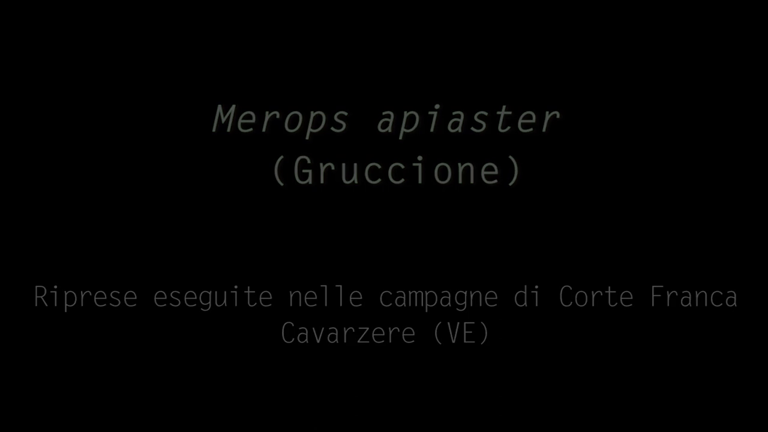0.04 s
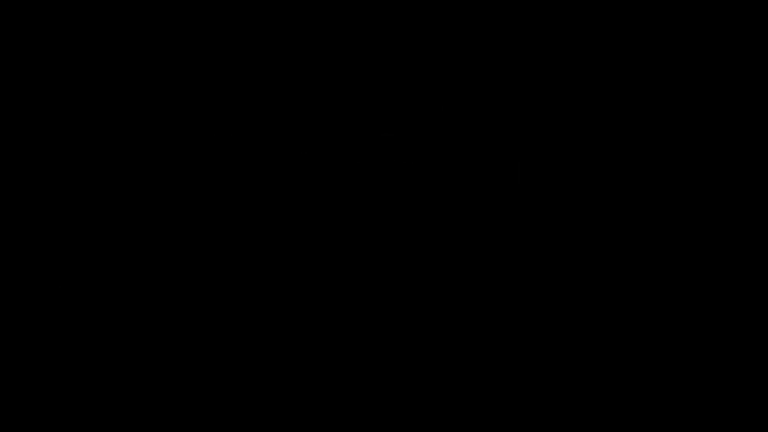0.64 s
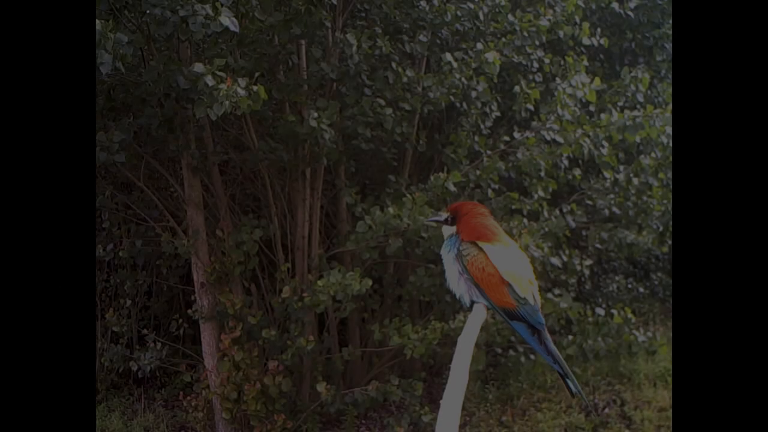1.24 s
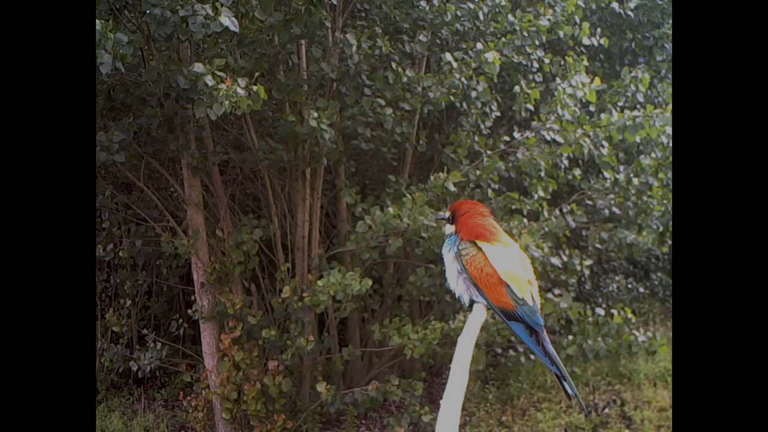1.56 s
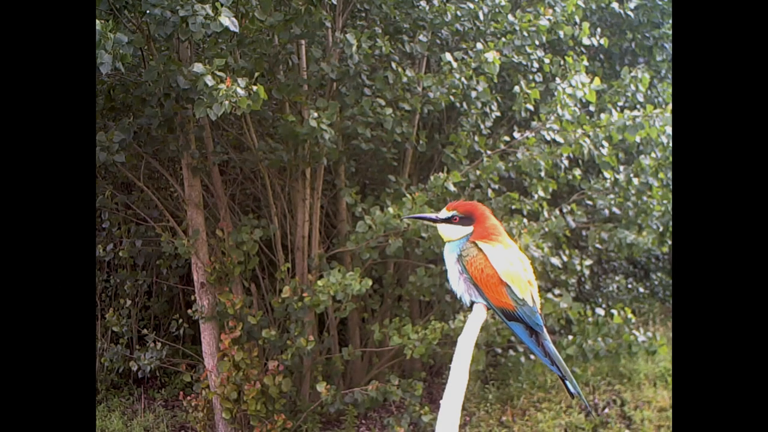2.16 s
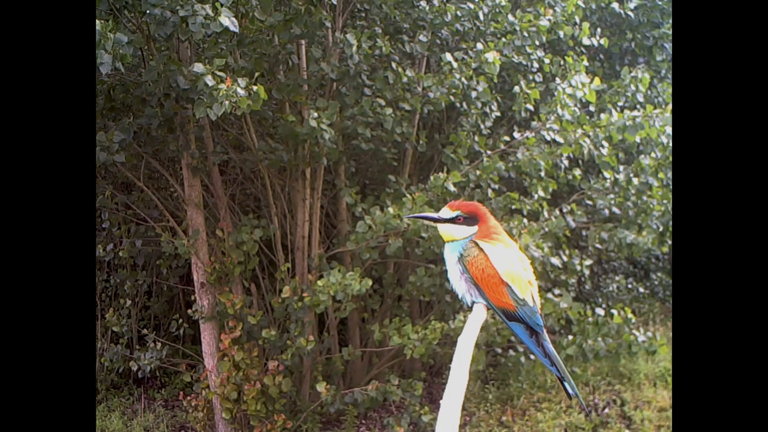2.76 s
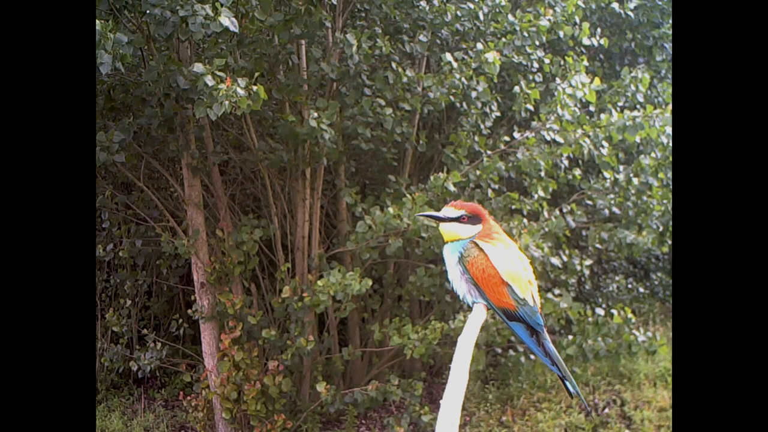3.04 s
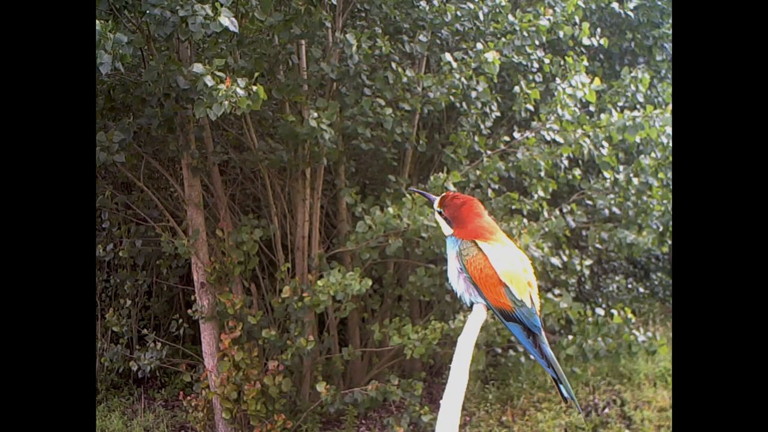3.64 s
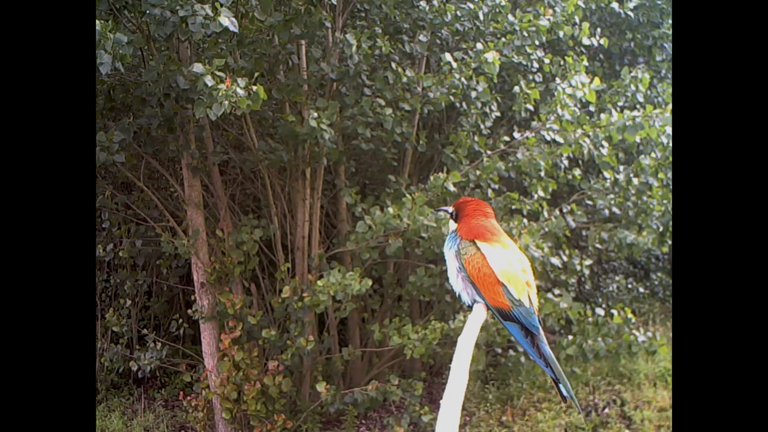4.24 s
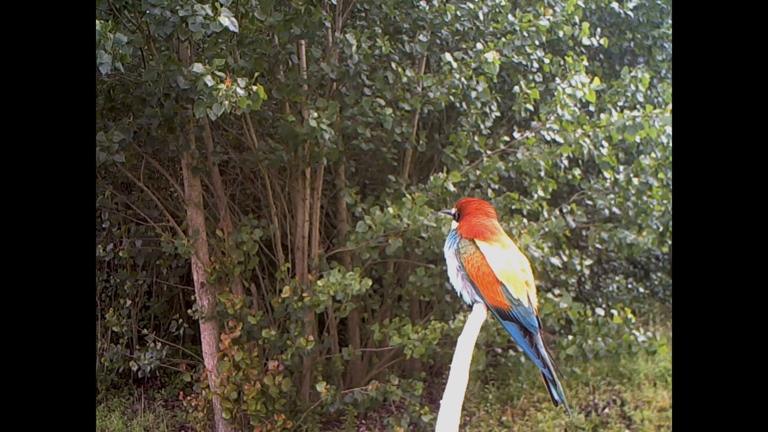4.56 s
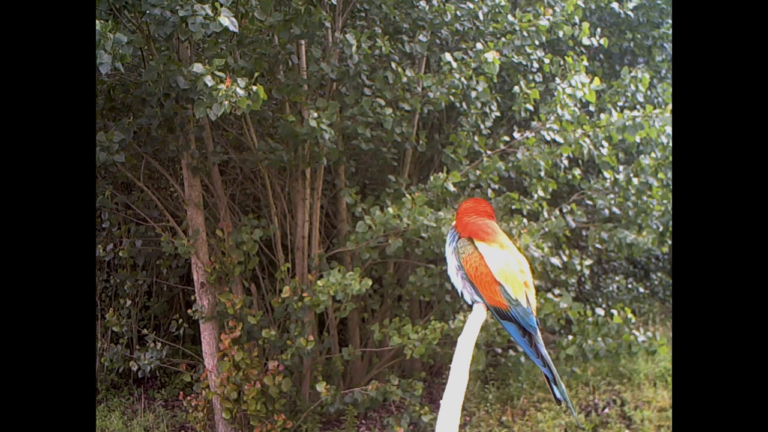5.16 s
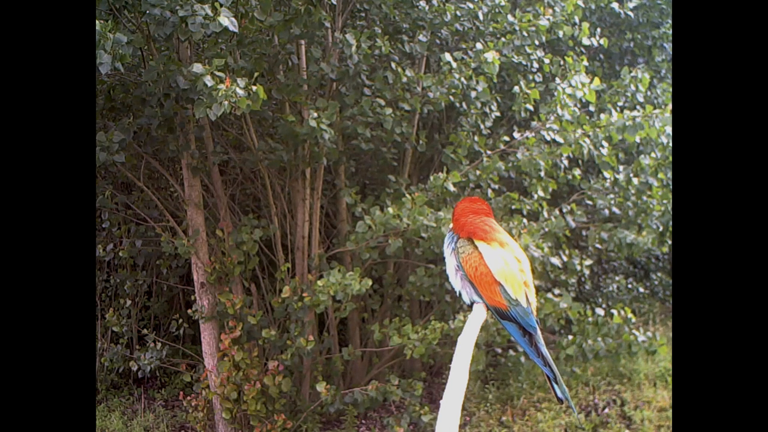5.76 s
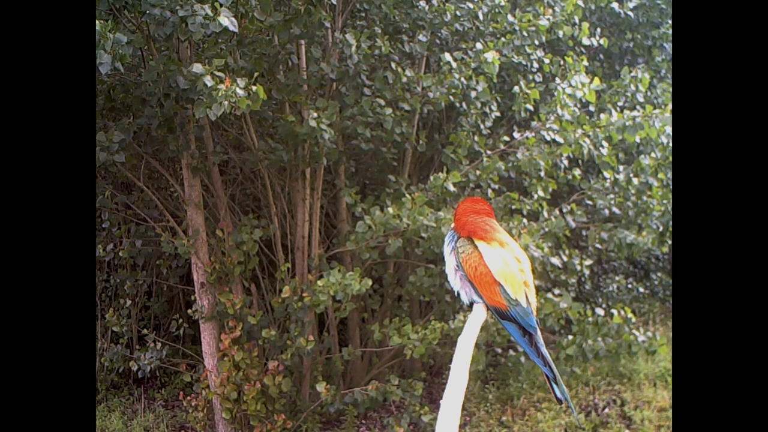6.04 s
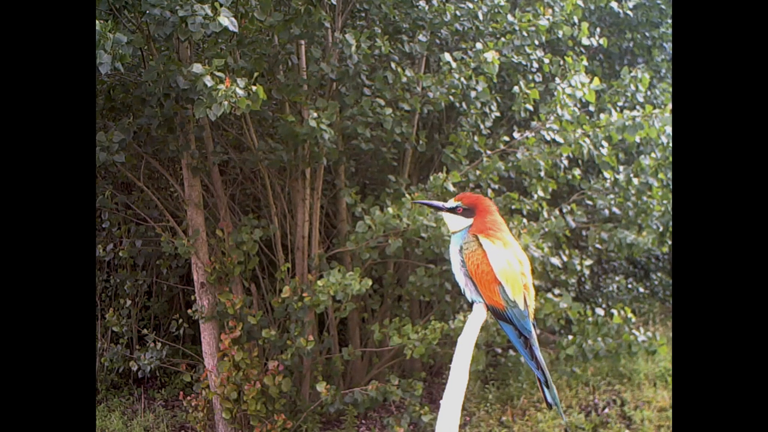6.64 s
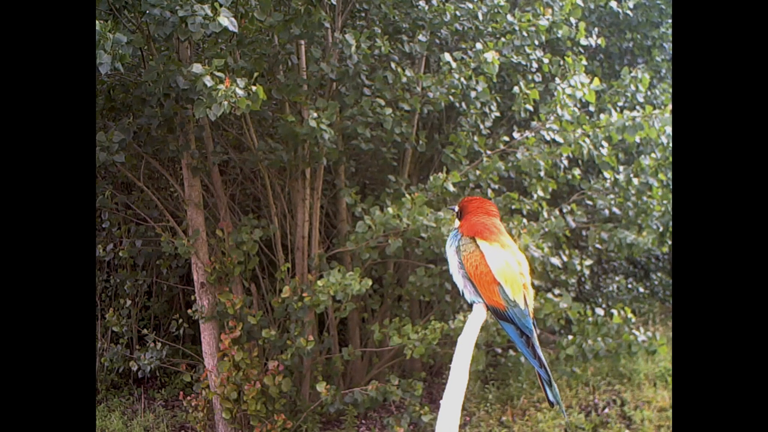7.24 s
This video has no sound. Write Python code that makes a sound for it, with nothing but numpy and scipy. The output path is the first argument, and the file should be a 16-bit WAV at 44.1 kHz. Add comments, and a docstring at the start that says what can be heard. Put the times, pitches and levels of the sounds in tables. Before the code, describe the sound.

A nearby bird gives two short, loud rolling whistles while others answer softly from the trees over a steady outdoor hiss.

```python
"""Bee-eaters at the edge of a wood

A perched bee-eater gives two loud, rolling whistles: near-pure tones from the syrinx that glide, flip
upward and sag back. The flock answers softly from farther off with calls and pips, and trunks and leaves
scatter every note and three dull ticks. Under them lie a steady hiss and a far engine that drones past.
The scene starts faint, fades out and slowly comes up again."""
import sys
import numpy as np
from scipy import signal
from scipy.fft import rfft, irfft
from scipy.io import wavfile

SR = 44100
rng = np.random.default_rng(int(sys.argv[2]) if len(sys.argv) > 2 else 0)


def pcm_store(signal):
    """Save signal as 16-bit PCM."""
    levels = np.round(np.clip(np.atleast_2d(signal), -1, 1) * 32767)
    wavfile.write(sys.argv[1], SR, levels.astype(np.int16).T)


N = 330750
TIME = np.arange(N) / SR

# how throat and bill colour the overtones of the flock's softer, reedier voices: f/Hz, level/dB
REEDY_THROAT = [(3200, -12), (4200, -22.5), (5700, -19), (7500, -35.5), (10000, -50)]


def from_db(db):
    """Decibels to gain."""
    return 10 ** (np.asarray(db) / 20)


def at_hz(points, hz):
    """Read a spectrum on a log-frequency axis."""
    points = np.array(points)
    return np.interp(np.log(np.maximum(hz, 1)), np.log(points[:, 0]), points[:, 1])


def rms_one(x):
    """Scale to unit rms."""
    return x / np.sqrt(np.mean(x ** 2) + 1e-20)


def wander(rate_hz, size):
    """Smooth random motion of spread 1."""
    run_in = SR // 5
    low_pass = signal.butter(4, rate_hz, fs=SR, output="sos")
    slow = signal.sosfilt(low_pass, rng.standard_normal(size + run_in))
    return rms_one(slow)[run_in:]


def span_of(start, length):
    """Times of the samples of one note."""
    return TIME[int(start * SR):int((start + length) * SR)]


def ramp(along, share):
    """A quarter sine from near 0 to 1 over the given share of a call."""
    return np.sin(np.pi / 2 * np.clip(along / share, 1e-4, 1))


def air(level_db=-49):
    """The outdoor bed: even hiss over a soft rumble."""
    # colour of the bed: f/Hz, relative level/dB
    spectrum = [(12, -35), (20, 1), (49, 0.5), (98, -3.5), (180, -8.5), (219, -9.5), (252, -10.5),
                (581, -14), (767, -16.5), (857, -16.5), (1200, -19), (1820, -20), (2760, -23.5),
                (13100, -29.5), (15500, -32)]
    colour = from_db(at_hz(spectrum, np.arange(N // 2 + 1) * SR / N))
    return from_db(level_db) * rms_one(irfft(rfft(rng.standard_normal(N)) * colour, N))


def far_engine():
    """The firing tone and two overtones, smeared into a throbbing drone by a long path in moving air."""
    # the engine's pass: t/s, firing rate/Hz, level before the fader/dB
    pass_by = [(0, 112, -63.5), (1.5, 112, -56), (2.3, 110, -46), (3.1, 107, -43.5), (3.6, 106, -44.5),
               (4.1, 98, -58), (5, 95, -65.5), (7.5, 95, -66.5)]
    s, firing_hz, level_db = np.transpose(pass_by)
    phase = 2 * np.pi * np.cumsum(np.interp(TIME, s, firing_hz)) / SR
    drone = np.zeros(N)
    for k, db, blur_hz in [(1, 0, 30), (2, -13, 24), (3, -24, 24)]:
        smeared = wander(blur_hz, N) * np.sin(k * phase) + wander(blur_hz, N) * np.cos(k * phase)
        drone += from_db(db) * smeared
    return from_db(np.interp(TIME, s, level_db)) * rms_one(drone)


def whistle(t, pitch_hz, level_db, throat, overtone_db, jitter=.004, roll_off_db=-4.5):
    """The syrinx sings a nearly pure tone whose weak overtones sweep through the throat's resonances."""
    flutter_db, bill_db, resonance_hz = 0.4923, 2.5, 1650
    pitch = pitch_hz * (1 + jitter * wander(440, len(t)))
    loudness = from_db(level_db + flutter_db * wander(499, len(t)))
    # below the throat's main resonance the fundamental loses support, so a call's ends are reedier
    reediness_db = overtone_db + 22 * np.maximum(np.log2(resonance_hz / pitch), 0)
    phase = 2 * np.pi * np.cumsum(pitch) / SR
    tone = np.sin(phase)
    for k in range(2, 10):
        colour_db = at_hz(throat, k * pitch) + reediness_db + roll_off_db * np.log2(k / 2)
        shimmer_db = bill_db * wander(130, len(t))   # each overtone swells and fades as the bill moves
        tone += from_db(colour_db + shimmer_db) * (k * pitch < SR / 2) * np.sin(k * phase)
    note = np.zeros(N)
    note[np.rint(t * SR).astype(int)] = np.sqrt(2) * loudness * tone * signal.windows.tukey(len(t), .04)
    return note


def register_flips(t, flip_s=0.00094, squareness=3.1):
    """The voice flips upward, holds and sags back; gives the Hz added to one call's pitch."""
    # the flips of all calls: t/s, leap/Hz, hold/s
    flips = [(0.123, 520, 0.01033), (3.531, 554.5, .0118), (3.5469, 120, .0027), (3.5648, 515, 0.0097),
             (4.079, 269.2, 0.01414), (4.095, 261.3, 0.01249), (4.128, 240, 0.0125), (4.734, 530, 0.0149),
             (4.773, 330.7, 0.0071), (4.792, 560, .020), (5.542, 370, .012), (5.588, 300, .053),
             (6.3598, 565, 0.01302), (6.3722, 305, 0.00583), (6.3805, 220, 0.00393), (6.3922, 560, 0.01147)]
    lift_hz = np.zeros(len(t))
    for s, leap_hz, hold_s in flips:
        if t[0] < s < t[-1]:
            rise = (1 + np.tanh((t - s) / flip_s)) / 2
            sag = np.exp(-(np.maximum(t - s, 0) / hold_s) ** squareness)
            lift_hz += leap_hz * rise * sag
    return lift_hz


def rolling_call(start, length, held_hz, level_db, loudest_s, overtone_db, depth, jitter,
                 throat, half_width_hz):
    """A whistle whose pitch and level rise, hold and fall in one arch, with register flips on top."""
    scoop_s, swell_s, swell_db = .0022, 0.015, 3.5
    t = span_of(start, length)
    along = np.linspace(0, 1, len(t))
    glide_in = 1 - depth * .346 * np.exp(-along / .138)
    glide_out = 1 - depth * 0.4696 * np.exp((along - 1) / .162)
    scoop = 1 - depth * 0.22 * np.exp(-np.minimum(t - t[0], t[-1] - t) / scoop_s)   # at both ends
    lift_hz = register_flips(t)
    pitch_hz = held_hz * glide_in * glide_out * scoop + lift_hz
    envelope = ramp(along, share=.367) ** .8 * ramp(1 - along, share=0.318) ** 1.19
    # the throat is tuned to the held pitch, so glides and flips are weaker
    resonance = 1 / np.hypot(1, (pitch_hz - held_hz) / half_width_hz)
    accent_db = swell_db * (np.exp(-((t - start - loudest_s) / swell_s) ** 2) - 1)
    contour_db = level_db + 20 * np.log10(envelope * resonance) + accent_db
    roll_off_db = -5.5 + 0.0091 * lift_hz   # per octave; the upper register is brighter
    return whistle(t, pitch_hz, contour_db, throat, overtone_db, jitter, roll_off_db)


def wood(x, wet_db, near_t60=0.25, far_t60=.55, far_db=-9, gap_s=0.012, tree_line_s=.06, leaves_hz=3500):
    """Near trunks echo briefly, the tree line answers later and lingers; leaves soak up the treble."""
    t = TIME[:SR]
    trunks = rng.standard_normal(SR) * np.sqrt(rng.exponential(1, SR))
    near = from_db(-60 * t / near_t60) * (1 - np.exp(-(t / gap_s) ** 2))
    far = from_db(far_db - 60 * t / far_t60) * (1 - np.exp(-(t / tree_line_s) ** 2))
    echoes = trunks * np.hypot(near, far)
    leaves = signal.butter(2, leaves_hz, fs=SR, output="sos")
    echoes = signal.sosfilt(leaves, echoes / np.linalg.norm(echoes))
    return x + from_db(wet_db) * signal.fftconvolve(x, echoes)[:N]


def flock():
    """Soft rolling calls: the farther the bird, the more of its voice arrives scattered by the trees."""
    # distant calls: t/s, length/s, held pitch/Hz, level/dB, accent after/s, overtone trim/dB,
    # glide depth/0-1, jitter/share of pitch, echo/dB
    calls = [(.090, .068, 2081, -44, 0.0297, -14, 0.95, .004, -6),
             (4.061, 0.0986, 1958, -33.5, 0.032, 0, 0.76, 0.01128, -6),
             (4.71, 0.1134, 2183, -44.5, 0.036, -9.5, .85, 0.0204, -0.5),
             (5.51, .064, 1839, -40, .026, -8.5, 0.4, .004, -7.5),
             (5.555, 0.114, 1908, -45, .053, 1, 0.62, .01, -1.5)]
    answers = np.zeros(N)
    for *call, echo_db in calls:
        voice = rolling_call(*call, throat=REEDY_THROAT, half_width_hz=700)
        answers += wood(voice, wet_db=echo_db, near_t60=0.23, gap_s=0.0056, leaves_hz=5041)
    return answers


def contact_pips(sag=0.11, edge_db=-10):
    """The flock's tiny contact notes among the trees: pitch and level rise and fall in one arch."""
    # arched pips: middle t/s, length/s, top pitch/Hz, level/dB, overtone trim/dB
    pips = [(1.546, .056, 1768, -50.5, -9.5), (1.645, 0.033, 1873, -47.5, -9),
            (3.408, 0.048, 1731, -56.5, 11.5), (3.452, 0.024, 1914, -53.5, 1.5),
            (3.49, 0.043, 1850, -49.5, -5.5), (6.829, .025, 1708, -58, -10),
            (6.903, .020, 2004, -59, -10.5), (7.028, 0.025, 1890, -51.5, -8),
            (7.345, .040, 1763, -51, -11.5), (7.483, .028, 1634, -54.5, -9.5)]
    notes = np.zeros(N)
    for middle, length, top_hz, level_db, overtone_db in pips:
        t = span_of(middle - length / 2, length)
        droop = np.linspace(-1, 1, len(t)) ** 2
        notes += whistle(t, top_hz * (1 - sag * droop), level_db + edge_db * droop,
                         REEDY_THROAT, overtone_db)
    return wood(notes, wet_db=-10)


def ticks(low_hz=650, high_hz=3600):
    """Very short, dull ticks, two of them at the height of the loud calls."""
    # single clicks: t/s, peak before the fader/dB
    hits = [(2.401, -36.5), (3.5449, -19), (6.389, -20.5)]
    clicks = np.zeros(N)
    for s, peak_db in hits:
        clicks[int(s * SR)] = from_db(peak_db)
    band = np.vstack([signal.butter(2, low_hz, "high", fs=SR, output="sos"),
                      signal.butter(4, high_hz, fs=SR, output="sos")])
    tick = signal.sosfilt(band, signal.unit_impulse(SR // 200))
    return np.convolve(clicks, tick / tick.max())[:N]


def perched_bird():
    """Two full-voiced rolling calls with deep glides, close to the microphone."""
    # close calls: t/s, length/s, held pitch/Hz, level/dB, accent after/s, overtone trim/dB
    calls = [(3.503, .0955, 2025, -6, .0325, -1.5), (6.331, 0.09753, 2044, -6.0, .0455, 0)]
    # how throat and bill colour the overtones: f/Hz, level/dB
    throat = [(2400, -8), (3000, -23.5), (3500, -34), (4250, -39), (4850, -25.5), (5150, -30), (5800, -40),
              (7400, -41), (8800, -65), (10000, -51.5), (10900, -37.5), (12200, -43), (14200, -41),
              (15800, -53.5)]
    return sum(rolling_call(*call, depth=0.985, jitter=.004, throat=throat, half_width_hz=480)
               for call in calls)


def scene():
    """Mono mix: a nearly dry foreground, the flock behind it, air and engine underneath."""
    foreground = wood(perched_bird() + ticks(),
                      wet_db=-26, near_t60=0.29, far_t60=0.62, far_db=-10.5, gap_s=0.016)
    return (foreground + flock() + contact_pips() + air() + far_engine())[None]


def record(dry, cutoff_hz=15600):
    """The fader starts low, closes and slowly opens fully; a steep low-pass cuts the top."""
    # fader ride: t/s, gain
    ride = [(0, .1), (.83, 0), (.87, 0), (3.2, 1), (7.5, 1)]
    fader = np.interp(TIME, *np.transpose(ride))
    low_pass = signal.ellip(12, .1, 80, cutoff_hz, fs=SR, output="sos")
    return signal.sosfilt(low_pass, dry * fader)


dry = scene()
out = record(dry)
pcm_store(out)
```